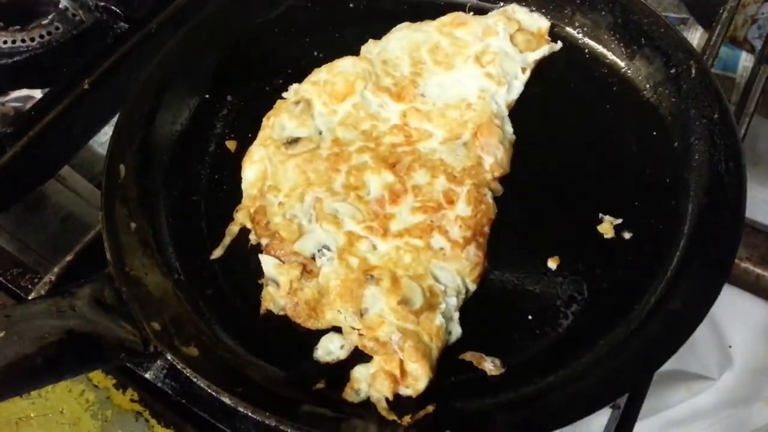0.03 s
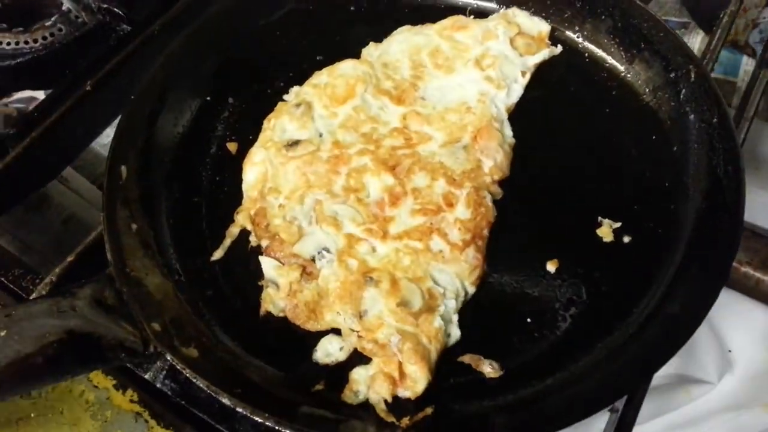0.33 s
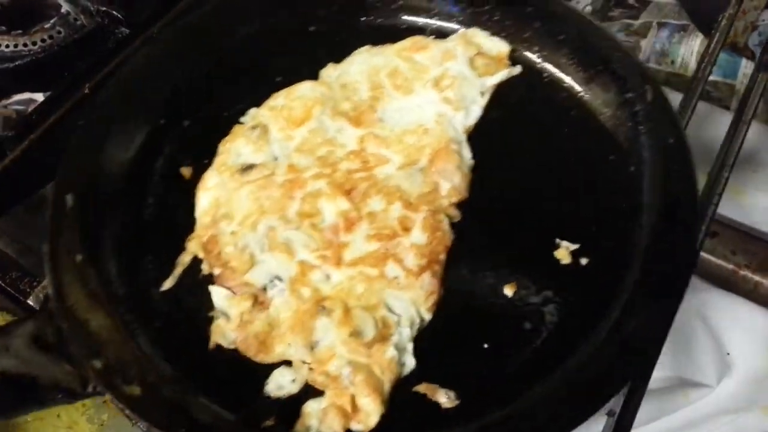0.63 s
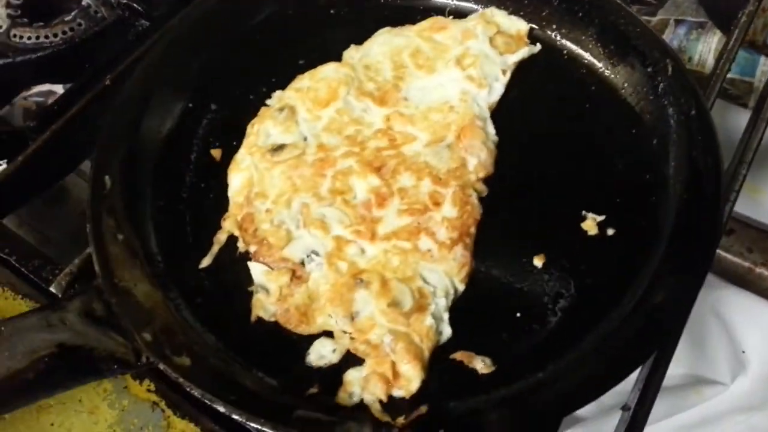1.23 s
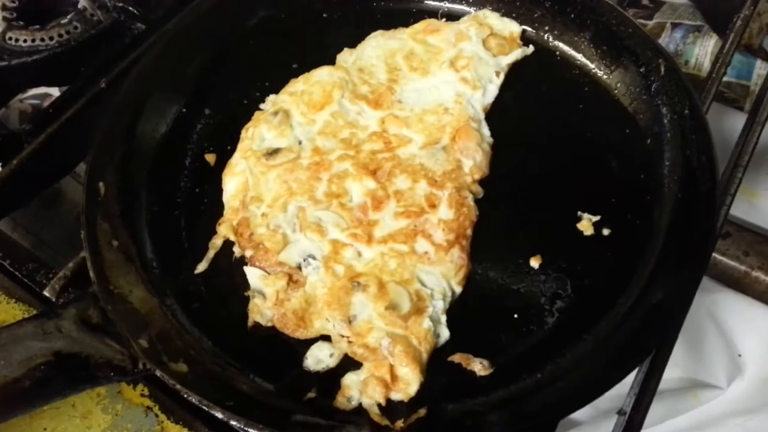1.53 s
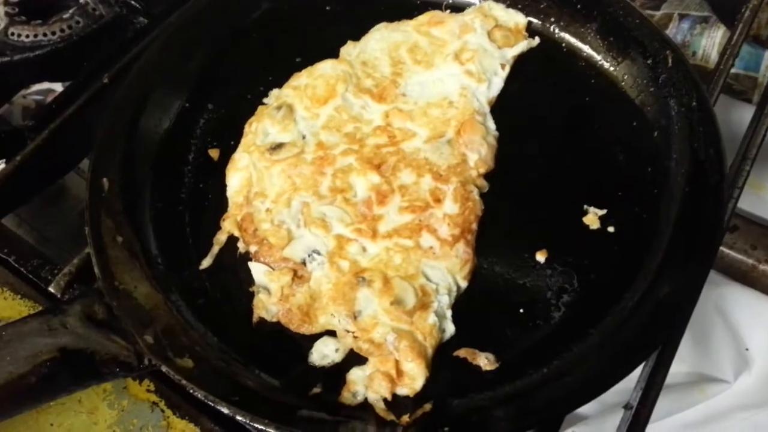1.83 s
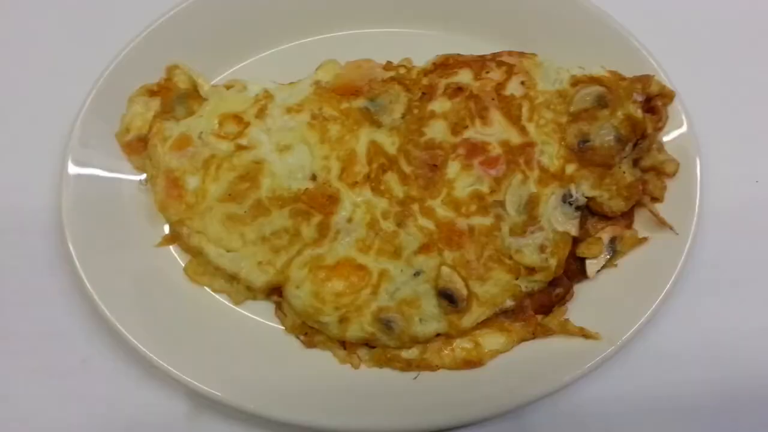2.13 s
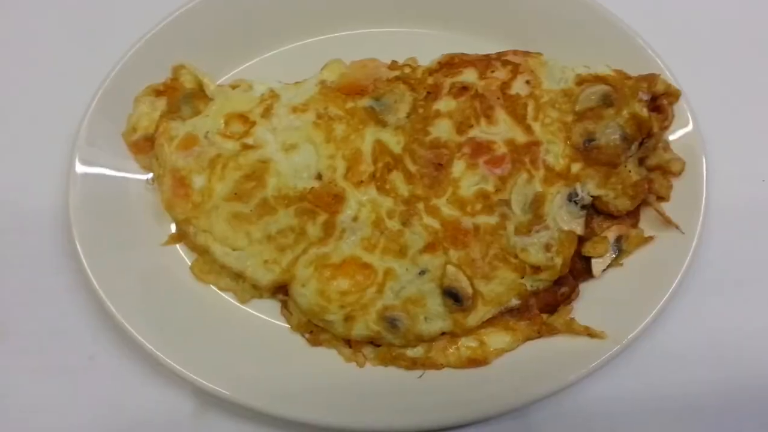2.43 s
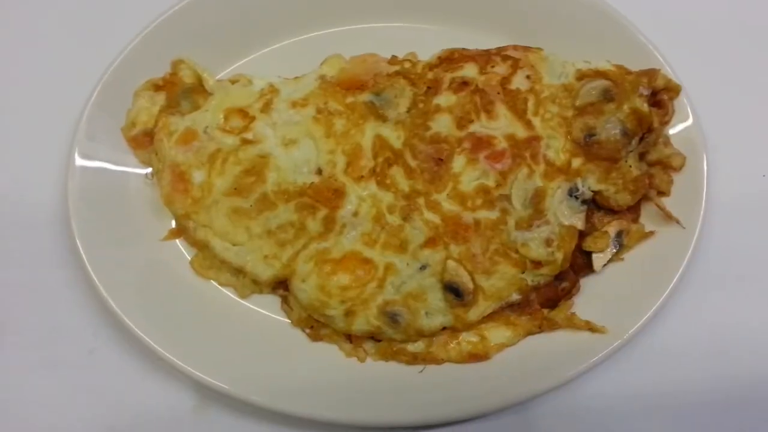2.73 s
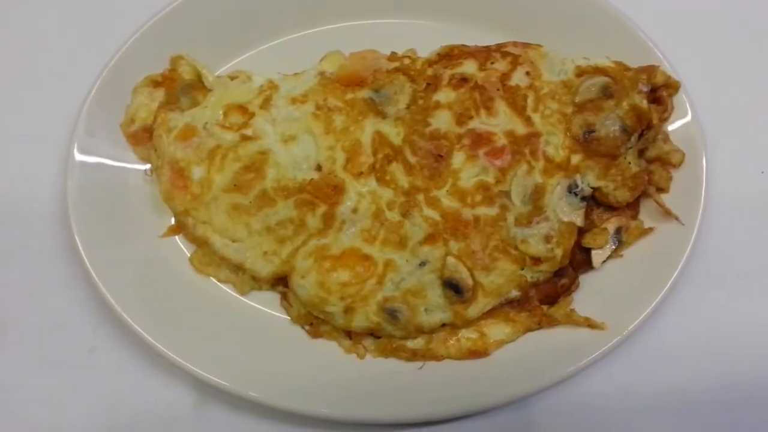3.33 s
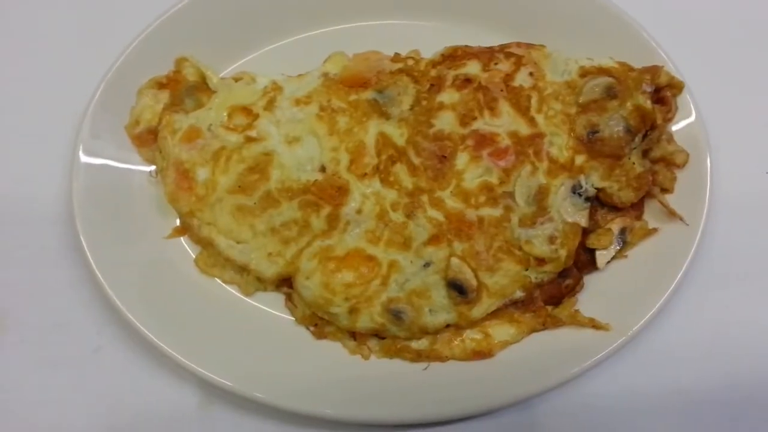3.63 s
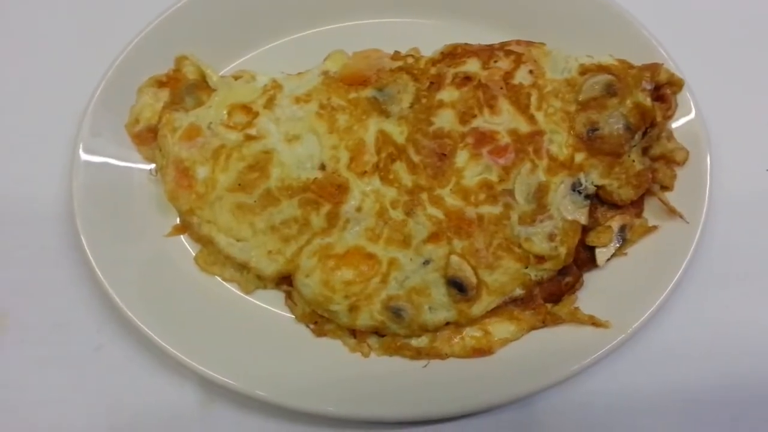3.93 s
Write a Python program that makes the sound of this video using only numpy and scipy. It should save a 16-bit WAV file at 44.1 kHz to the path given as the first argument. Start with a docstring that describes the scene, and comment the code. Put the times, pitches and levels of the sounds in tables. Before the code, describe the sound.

An omelette sizzles softly in a pan close to the microphone while a kitchen fan hums. Fat spits, once sharply, and something wooden clatters. After a sudden cut, the fan continues with only faint, distant fizzing.

```python
"""An omelette sizzles close by: thousands of steam bubbles a second burst in the fat, in a soft hiss.
Drops spit, one sharply, and something heavy is set down with a short wooden clatter.
Behind it a kitchen fan hums, whirrs and blows, throbbing with every turn of the rotor.
Then a cut to the plated omelette: the fan hums on and the pan fizzes faintly, farther off."""
import sys
import numpy as np
from scipy import signal
from scipy.fft import rfft, irfft
from scipy.io import wavfile
from scipy.ndimage import uniform_filter1d, minimum_filter1d

SR = 44100
rng = np.random.default_rng(int(sys.argv[2]) if len(sys.argv) > 2 else 0)


def waveform_to_disk(signal):
    """Save audio, clipped to [-1, 1], as 16-bit WAV at the path in sys.argv[1]."""
    frames = np.transpose(np.atleast_2d(signal))
    scaled = np.clip(frames, -1, 1) * 32767
    samples = np.round(scaled).astype(np.int16)
    wavfile.write(sys.argv[1], SR, samples)


N = 176400
T = np.arange(N) / SR


def amp(db):
    """Decibels to gain."""
    return 10 ** (np.asarray(db) / 20)


def unit(x):
    """Scales to rms 1."""
    return x / np.sqrt(np.mean(x ** 2) + 1e-20)


def noise(samples=N):
    """Two independent channels of white noise."""
    return rng.standard_normal((2, samples))


def lookup(table, hz):
    """Interpolates on a log-frequency axis."""
    table_hz, values = np.transpose(table)
    return np.interp(np.log(hz + 1), np.log(table_hz + 1), values)


def balance(left_minus_right_db):
    """Left and right gains."""
    return amp(left_minus_right_db * np.array([[.5], [-.5]]))


def bandpass(x, low_hz, high_hz):
    """Butterworth band-pass."""
    return signal.sosfilt(signal.butter(2, [low_hz, high_hz], "bandpass", fs=SR, output="sos"), x)


def add(mix, start_s, sound):
    """Mixes in a stereo sound."""
    part = mix[:, round(start_s * SR):][:, :sound.shape[1]]
    part += sound[:, :part.shape[1]]


# Microphone pair likeness: freq_hz, coherence
MIC_COHERENCE = [(30, 0.4), (90, 0.85), (180, 0.79), (350, 0.63), (700, 0.06), (1300, 0.017), (3000, 0.045),
                 (15000, 0.025)]
# Microphone pair balance: freq_hz, left_minus_right_db
MIC_BALANCE = [(50, 2), (300, 1.5), (1200, 3.5), (2200, 4.5), (2900, -1.5), (4000, 4.5), (5500, 8),
               (7000, -4.5), (8500, 2), (10000, 0), (12000, 3.5), (14500, 1)]

def colour(x, spectrum):
    """Gives two independent channels a spectrum and the microphones' stereo image; rms 1."""
    hz = np.fft.rfftfreq(x.shape[1], 1 / SR)
    left, other = rfft(x)
    coherence = lookup(MIC_COHERENCE, hz)
    right = coherence * left + np.sqrt(1 - coherence ** 2) * other
    pair = np.array([left, right]) * balance(lookup(MIC_BALANCE, hz))
    return unit(irfft(pair * amp(lookup(spectrum, hz)), x.shape[1]))


# Kitchen reverberation: freq_hz, t60_s
ROOM_DECAY = [(100, 0.73), (500, 0.39), (2000, 1), (8000, 0.12), (15000, 0.055)]

def room(x):
    """The kitchen's reverberation: a noise tail that dies soonest in the treble."""
    white = colour(noise(SR // 2), [(20, 0), (20000, 0)])
    hz, t, bins = signal.stft(white, SR, nperseg=256)
    decay = amp(-60 * t / lookup(ROOM_DECAY, hz)[:, None]) * (t > .004)
    tail = signal.istft(bins * decay, nperseg=256)[1]
    return signal.fftconvolve(x, tail / np.linalg.norm(tail[0]), axes=1)[:, :N]


TURNS_PER_S = 8.68
# Rising fan tone: start_turns, length_turns, from_hz, to_hz
WHOOP_GLIDE = (.62, .85, 560, 860)

def fan_whoop():
    """A soft tone slides upward once a turn."""
    start_turns, length_turns, from_hz, to_hz = WHOOP_GLIDE
    progress = np.minimum((TURNS_PER_S * T - start_turns) % 1 / length_turns, 1)
    cycles = np.cumsum(from_hz + (to_hz - from_hz) * progress) / SR
    tone = np.sin(2 * np.pi * cycles + rng.random((2, 1)) * np.pi / 2)
    return unit(np.sin(np.pi * progress) * tone)


# Fan housing resonances: centre_hz, width_hz, gain_db
HOUSING_MODES = [(1071, 47, -1.5), (1350, 53, -1.5), (1538, 95, 2), (2123, 240, -9)]

def rotor_whirr(repeat_share=.88):
    """The rotor rubs much the same way on every turn and rings the housing."""
    one_turn = noise(round(SR / TURNS_PER_S))
    repeating = one_turn[:, np.arange(N) % one_turn.shape[1]]
    rub = np.sqrt(repeat_share) * repeating + np.sqrt(1 - repeat_share) * noise()
    out = np.zeros((2, N))
    for hz, width_hz, gain_db in HOUSING_MODES:
        ring = unit(bandpass(rub, hz - width_hz / 2, hz + width_hz / 2))
        out += amp(gain_db) * ring * balance(lookup(MIC_BALANCE, hz))
    return unit(out)


# Motor tones at stove and plate: pitch_hz, level_db, swing_db, swing_phase_turns, flutter_rad
STOVE_TONES = [(73, -54, 2, 0.17, .2), (99.8, -33, 4, .65, .05), (199.7, -42, 4, .17, .3),
               (158, -49.5, -7, 0.2, 0.5), (183.4, -43.5, 5.5, 0.14, 0.45), (607.6, -41.3, 2.5, .95, .35),
               (790, -33, 3.6, .12, .45), (850, -47, 3, .42, .3), (745, -40, -11.5, 0.24, 1.46)]
PLATE_TONES = [(74, -51, 1.2, .17, .12), (177, -45.5, 3, .11, 1.2), (360, -49.5, 2.7, .073, .3),
               (99.8, -36.5, 4, .56, .1), (199.6, -40.7, 1, .1, .15), (598.7, -46.5, 4, .8, .6),
               (690, -49.5, 4, .97, .3), (790, -38.3, 5.5, .17, .35), (850, -52, 2, .3, .3)]

def motor_hum(at_stove, uneven_db=.9, flutter_width=.64):
    """Motor tones throb and flutter with every turn, sagging in pitch as they swell."""
    rotor_rad = 2 * np.pi * TURNS_PER_S * T
    orders = np.arange(1, 5)[:, None]
    harmonics = np.exp(1j * orders * rotor_rad) / orders
    out, knots_s = np.zeros((2, N)), T[::1500]
    for hz, level_db, swing_db, phase_turns, flutter_rad in STOVE_TONES if at_stove else PLATE_TONES:
        drift = unit(np.interp(T, knots_s, rng.standard_normal(len(knots_s))))
        throb = np.exp(1j * (2 * np.pi * phase_turns - rotor_rad))  # complex: moves level and pitch
        swell = amp(swing_db * throb + uneven_db * drift)
        mid, side = (np.exp(2j * np.pi * rng.random((2, len(orders)))) @ harmonics).real
        flutter = flutter_rad * unit(mid + flutter_width * np.array([side, -side]))
        carrier = np.exp(2j * np.pi * (hz * T + rng.random()) + 1j * flutter)
        out += amp(level_db) * unit((swell * carrier).real) * balance(lookup(MIC_BALANCE, hz))
    return out


# Air spectra at stove and plate: freq_hz, density_db
STOVE_AIR = [(45, -41), (75, 5), (130, -14), (180, 6.5), (240, -8), (400, -0.5), (540, -10), (750, -2.5),
             (1200, -9.5), (1600, -10), (2200, -8.5), (2900, -19.5), (15000, -50)]
PLATE_AIR = [(20, -28), (45, -23), (80, -1), (130, 0.5), (180, -0.5), (250, -10), (330, 2), (540, -6.5),
             (750, 2), (930, -7.5), (1370, -9.5), (1560, -7.5), (1800, -13), (2150, -11.5), (2800, -21.5),
             (15000, -43)]

def air_rush(at_stove):
    """The fan's moving air, coloured at the plate by the kitchen's resonances."""
    return colour(noise(), STOVE_AIR if at_stove else PLATE_AIR)


def fan(near):
    """Motor, rotor and air from the stove (near = 1) or, slightly more to the right, the plate (0)."""
    stove = motor_hum(at_stove=True) + amp(-36.5) * rotor_whirr() + amp(-32) * air_rush(at_stove=True)
    plate = motor_hum(at_stove=False) + amp(-41) * rotor_whirr() + amp(-35) * air_rush(at_stove=False)
    return amp(-46.5) * fan_whoop() + near * stove + (1 - near) * plate * balance(-1.34)


# Ring of the struck body: pitch_hz, gain_db, t60_s
BODY_MODES = [(113.4, -13, 0.6), (247.4, 2, 0.15), (330, 1, .14), (438, -8, 0.077), (606, -7.5, 0.072),
              (757, 3, 0.13), (892, 1, 0.092), (978, 3, 0.073), (1358, -8, 0.082), (1537, -9, 0.11),
              (2040, -13.5, 0.096)]
# Impact noise: freq_hz, density_db
THUD_SPECTRUM = [(30, -20), (100, -11), (240, -0.5), (900, -4), (1300, -8), (2200, -11), (3000, -13.5),
                 (15000, -53)]
# Soft bumps, then the clatter: start_s, gain_db, thud_decay_s, lowpass_hz
KNOCK_HITS = [(.146, -26.5, 0.014, 610), (.186, -21.5, 0.013, 350), (0.242, -25.5, 0.012, 350),
              (1.8078, -9.5, 0.0094, 2370), (1.8215, -14.5, 0.018, 2300), (1.846, -17, 0.024, 2300),
              (1.859, -19, 0.02, 2380), (1.873, -16.5, 0.014, 2380), (1.913, -19.5, 0.021, 706),
              (1.955, -26, 0.068, 258), (2.029, -16.5, 0.03, 135)]

def knocks(rise_s=.0013):
    """Each knock is a dull thud and a short ring of one wooden body, answered by the room."""
    out, t = np.zeros((2, N)), np.arange(SR // 3) / SR
    ring = sum(amp(db - 60 * t / t60_s) * np.sin(2 * np.pi * hz * t) for hz, db, t60_s in BODY_MODES)
    attack = 1 - np.exp(-t / rise_s)
    for start_s, gain_db, decay_s, lowpass_hz in KNOCK_HITS:
        thud = colour(noise(len(t)), THUD_SPECTRUM) * np.exp(-t / decay_s)
        blow = amp(gain_db) * attack * (amp(1) * ring / 2 + amp(4) * thud)
        add(out, start_s, bandpass(blow, 40, lowpass_hz))
    return out + amp(-10) * room(out)


def flicker(x, depth_db):
    """Patches of the spectrum swell and sink at random, most in the treble."""
    hz, _, bins = signal.stft(x, SR, nperseg=256)
    across_bins = uniform_filter1d(rng.standard_normal(bins.shape[1:]), size=30, axis=0)
    patches = unit(uniform_filter1d(across_bins, size=10, axis=1))
    gain = amp(depth_db * np.sqrt(hz[:, None] / 12000) * patches)
    return signal.istft(bins * gain, nperseg=256)[1][:, :N]


def bubbles(bursts_per_s=5000, spread_db=4, hiss_share=.69):
    """Tiny steam bubbles burst, a few large, in a soft hiss."""
    sizes = amp(spread_db * np.minimum(rng.exponential(1, N), 5))
    bursting = rng.random(N) < bursts_per_s / SR
    bursts = unit(sizes * bursting * noise())
    return flicker(np.sqrt(1 - hiss_share) * bursts + np.sqrt(hiss_share) * noise(), depth_db=2)


# Distant pan, steady fizz and spurts: freq_hz, density_db
FIZZ_SPECTRUM = [(2000, -26), (2850, -14), (3280, 2.5), (3750, -8), (4300, 1), (4700, -3), (5600, 1),
                 (7200, 2), (8500, -5.5), (11500, -16), (14500, -75)]
SPURT_SPECTRUM = [(2000, -5), (3800, -12), (5600, 0), (7400, -2.5), (9400, -15), (14500, -27)]
# Spurts of fizz: start_s, level_db, decay_s
FIZZ_SPURTS = [(2.572, -41, 0.033), (2.612, -41.5, 0.035), (3.258, -38.5, 0.054), (3.478, -38, 0.037),
               (3.778, -31, 0.045), (3.955, -42, 0.033)]

def far_pan(rise_s=.004):
    """Bubbles fizz faintly across the kitchen, with now and then a brighter spurt."""
    spurt_power = np.zeros(N)
    for start_s, level_db, decay_s in FIZZ_SPURTS:
        age_s = np.maximum(T - start_s, 0)
        envelope = np.minimum(age_s / rise_s, 1) * np.exp(-np.maximum(age_s - rise_s, 0) / decay_s)
        spurt_power += (amp(level_db) * envelope) ** 2
    fizz = amp(-48) * colour(bubbles(), FIZZ_SPECTRUM)
    return fizz + np.sqrt(spurt_power) * colour(bubbles(), SPURT_SPECTRUM)


# Bursting drops (the row at 1.7078 s is the echo of the big pop at 1.7046 s): start_s, gain_db, pitch_hz
FAT_SPITS = [(0.8247, -12.5, 6940), (.8975, -22, 11600), (1.3127, -15, 7350), (1.5797, -12, 6940),
             (1.7046, -1, 5400), (1.7078, -7, 5700), (1.8153, -12.5, 7400), (1.8876, -14, 6800),
             (1.9323, -15, 12500), (1.8562, -14, 7000), (2.0403, -13, 5800), (2.615, -26, 5800),
             (3.264, -29, 3380), (3.78, -32, 5000)]

def spits(ring_decay_s=.00035, crack_decay_s=.0006):
    """Single drops burst in the fat: a bright crack and a ring of a few cycles."""
    out, t = np.zeros((2, N)), np.arange(SR // 100) / SR
    ring_envelope = t / ring_decay_s * np.exp(1 - t / ring_decay_s)
    for start_s, gain_db, hz in FAT_SPITS:
        ring = np.sin(2 * np.pi * (hz * t + rng.random((2, 1)) / 2)) * ring_envelope
        crack = unit(np.diff(noise(len(t) + 1))) * np.exp(-t / crack_decay_s)
        add(out, start_s, amp(gain_db) * balance(lookup(MIC_BALANCE, hz)) * (ring + .9 * crack))
    return out + amp(-13) * room(out)


# Close frying: freq_hz, density_db
SIZZLE_SPECTRUM = [(1800, -16), (2900, -12), (3640, -6.5), (5290, -1), (7000, 0.5), (8400, -3.5),
                   (9900, -10), (11600, -4.5), (12900, -8.5), (14500, -8.5)]
# Frying loudness: time_s, level_db
SIZZLE_ENVELOPE = [(0.0, -22), (0.352, -25.5), (0.394, -21), (0.526, -25), (1.322, -23), (1.478, -25),
                   (1.576, -21.5), (1.69, -28)]

def sizzle():
    """Bubbles burst at the omelette's frying edge, close to the microphone."""
    level_db = np.interp(T, *np.transpose(SIZZLE_ENVELOPE), right=-23.5)
    return colour(bubbles(), SIZZLE_SPECTRUM) * amp(level_db)


CUT_S, CROSSFADE_S, FAR_LOWPASS_HZ = 2.069, .031, 6500

def scene():
    """At the stove until the cut, then at the plate, where the spits are duller."""
    near = np.clip(.5 - (T - CUT_S) / CROSSFADE_S, 0, 1)
    near_spits = spits()
    far_spits = signal.sosfilt(signal.butter(3, FAR_LOWPASS_HZ, fs=SR, output="sos"), near_spits)
    background = fan(near)
    stove = near * sizzle() + near_spits + knocks()  # the sizzle fades faster at the cut
    plate = far_pan() + far_spits
    return background + near * stove + (1 - near) * plate


THRESHOLD_DB, MAX_DUCK_DB, ATTACK_S, RELEASE_DB_PER_S = -9, 8, .00031, 700
BAND_LIMIT_HZ = 14700

def record(dry):
    """A treble-keyed limiter ducks everything after a sharp pop; then clipping and a band limit."""
    treble_power = uniform_filter1d((np.diff(dry, prepend=0) ** 2).mean(0), size=30)
    over_db = np.clip(10 * np.log10(abs(treble_power) + 1e-12) - THRESHOLD_DB, 0, MAX_DUCK_DB)
    held_db = -minimum_filter1d(-over_db, size=301, origin=150)  # 7 ms hold
    ramp_db = T * RELEASE_DB_PER_S
    released_db = np.maximum.accumulate(held_db + ramp_db) - ramp_db
    pole = np.exp(-1 / (ATTACK_S * SR))
    duck_db = signal.lfilter([1 - pole], [1, -pole], released_db)
    clipped = np.clip(dry / amp(duck_db), -.92, .92)
    lowpass = signal.firwin(401, BAND_LIMIT_HZ, window=("kaiser", 9), fs=SR)
    return signal.oaconvolve(clipped, lowpass[None], "same")


dry = scene()
out = record(dry)
waveform_to_disk(out)
```